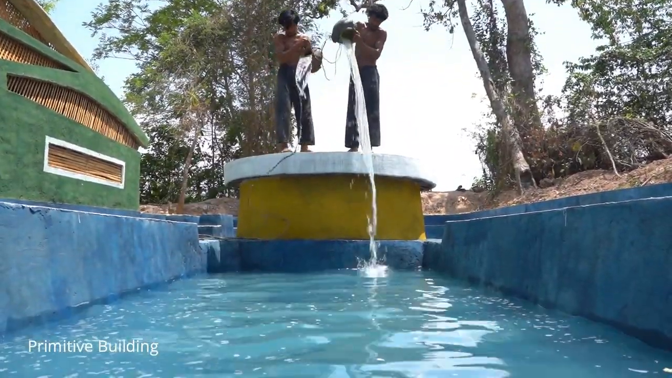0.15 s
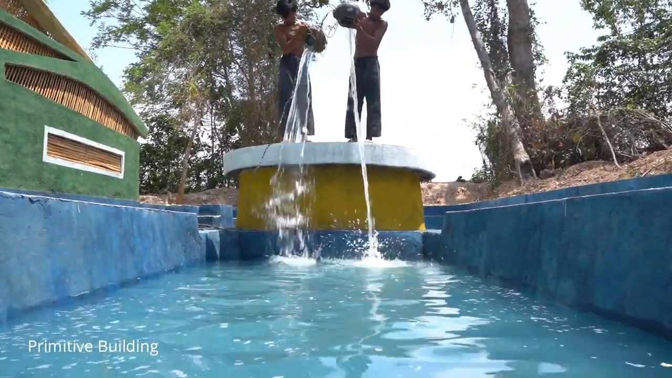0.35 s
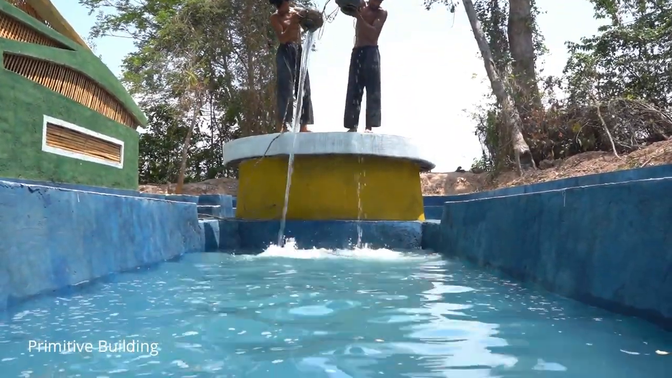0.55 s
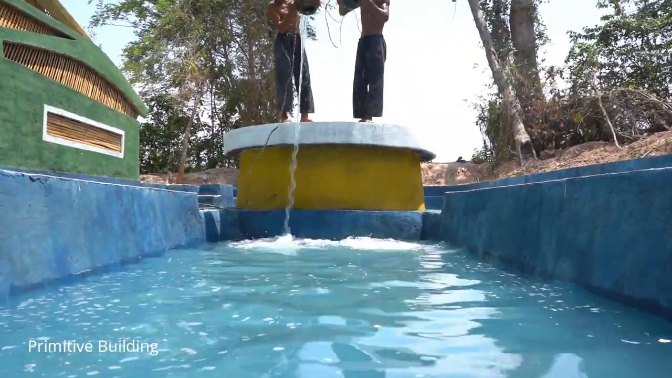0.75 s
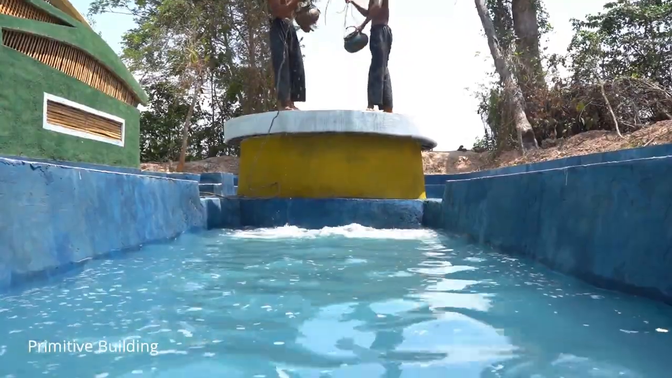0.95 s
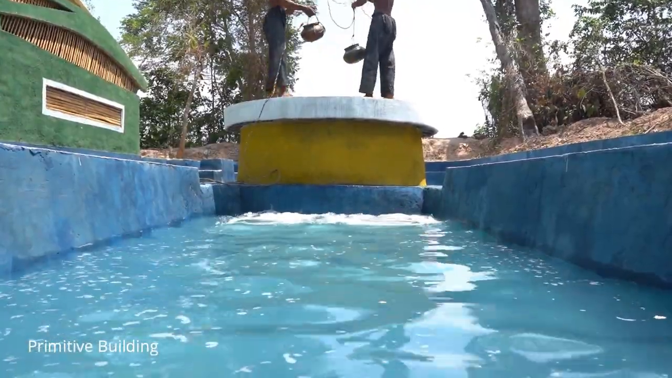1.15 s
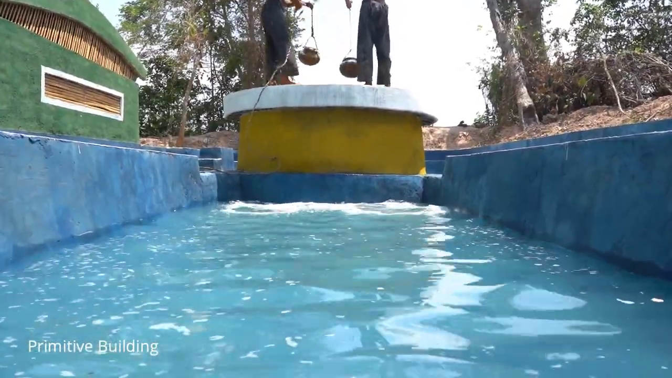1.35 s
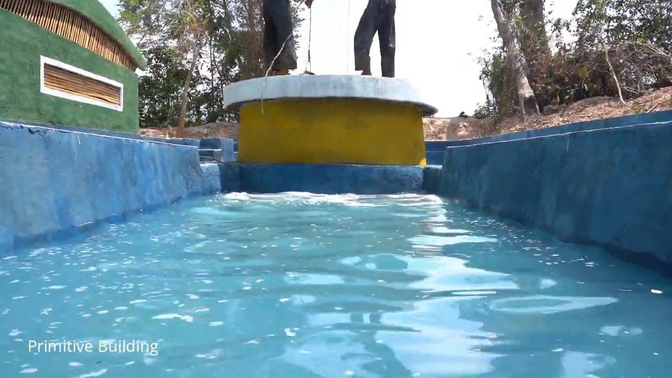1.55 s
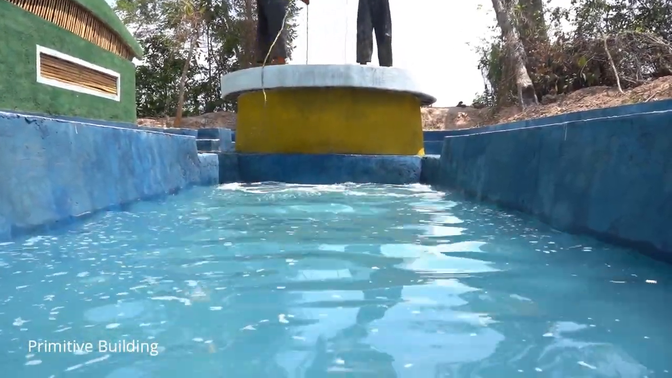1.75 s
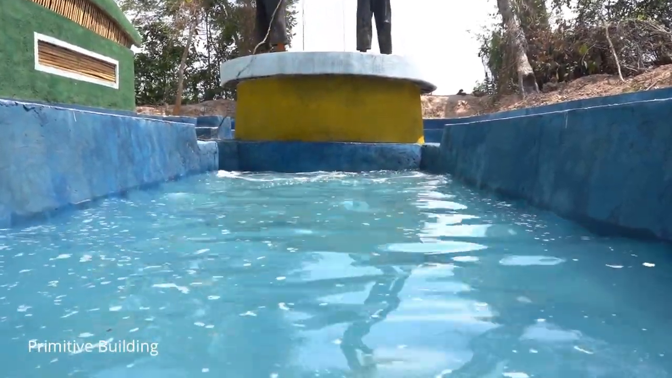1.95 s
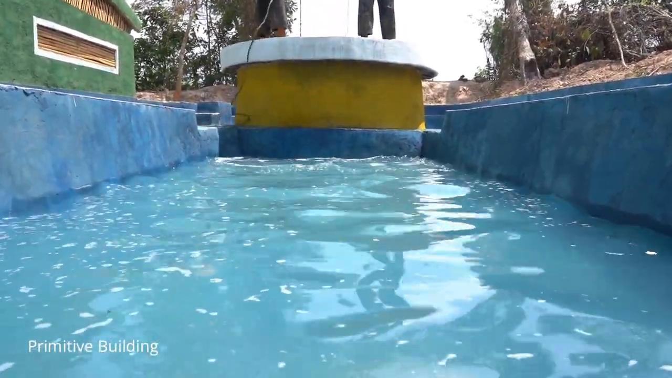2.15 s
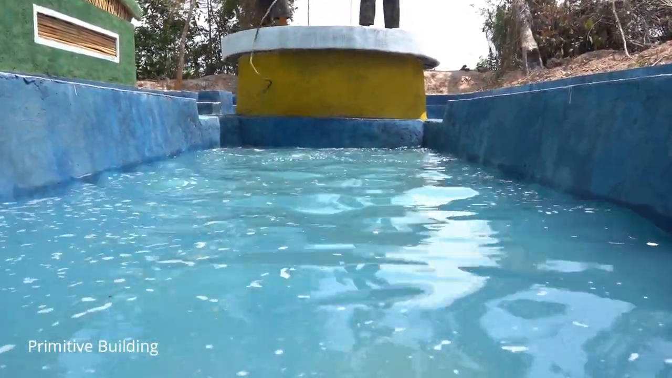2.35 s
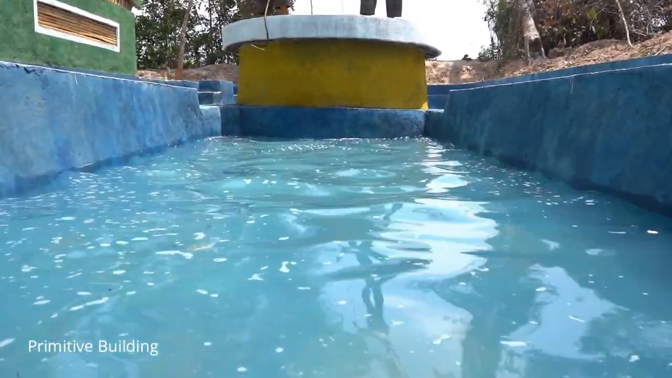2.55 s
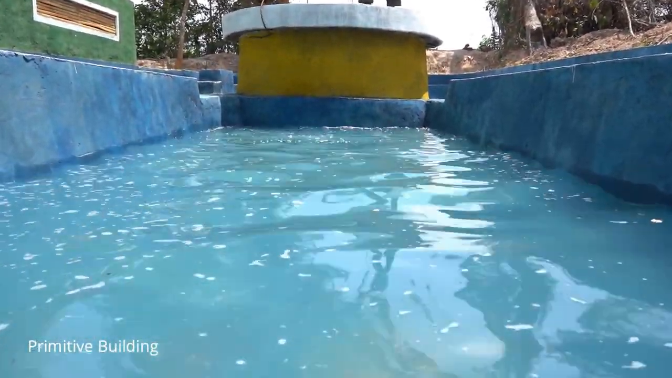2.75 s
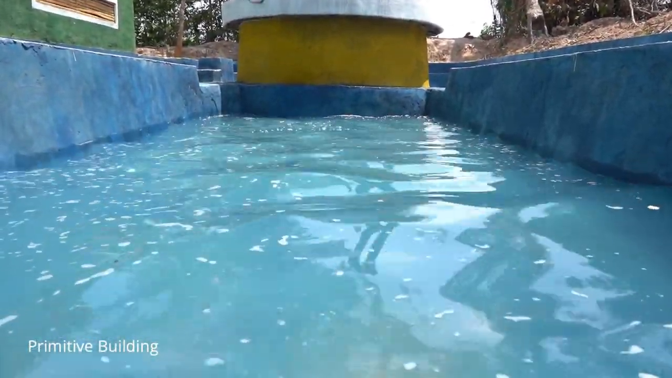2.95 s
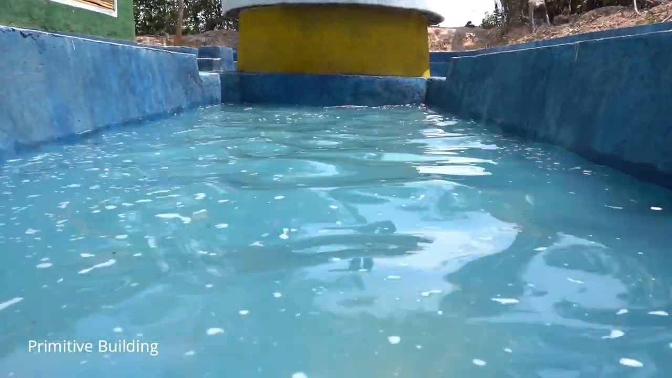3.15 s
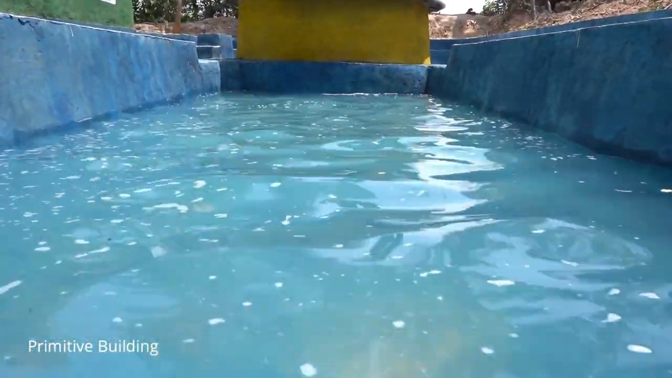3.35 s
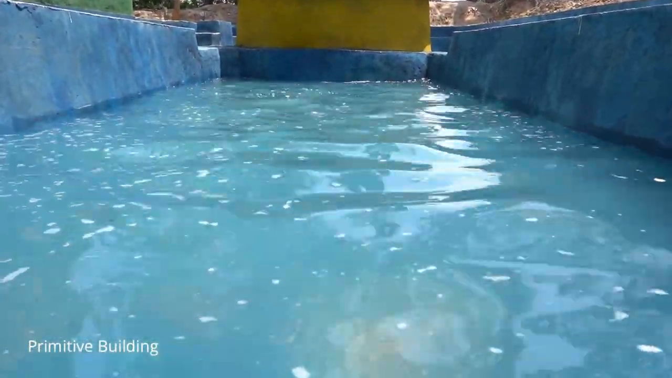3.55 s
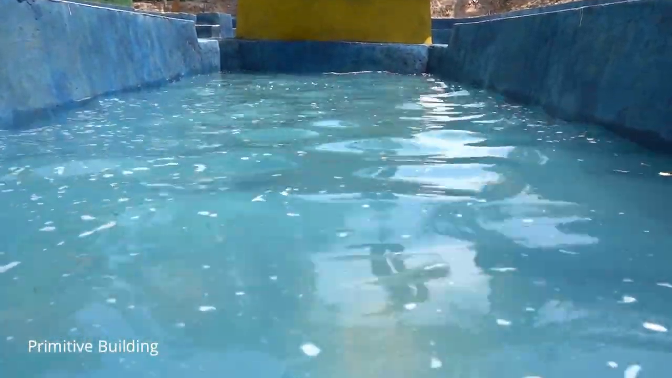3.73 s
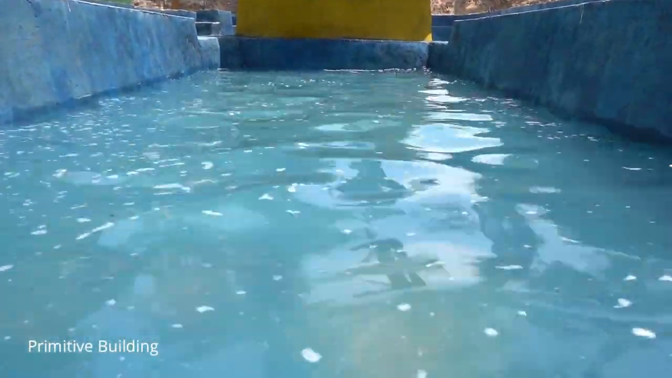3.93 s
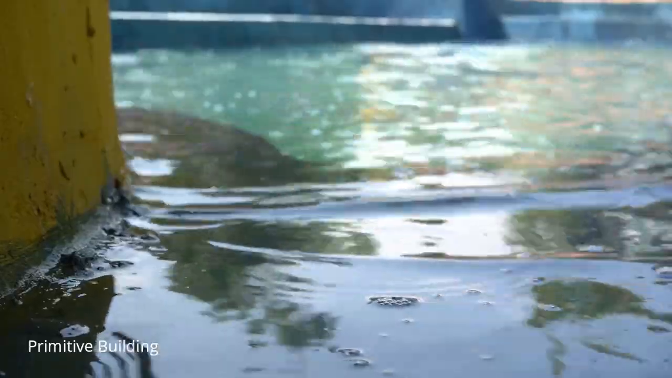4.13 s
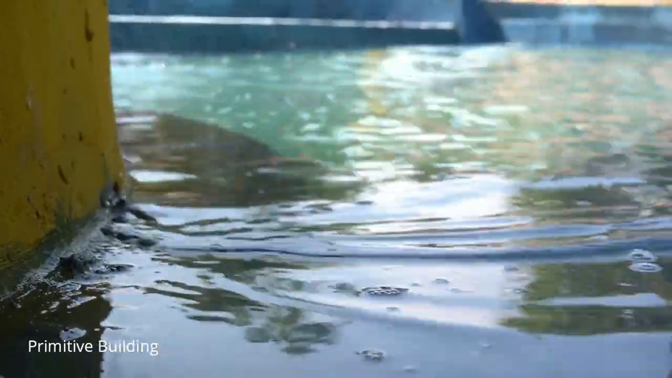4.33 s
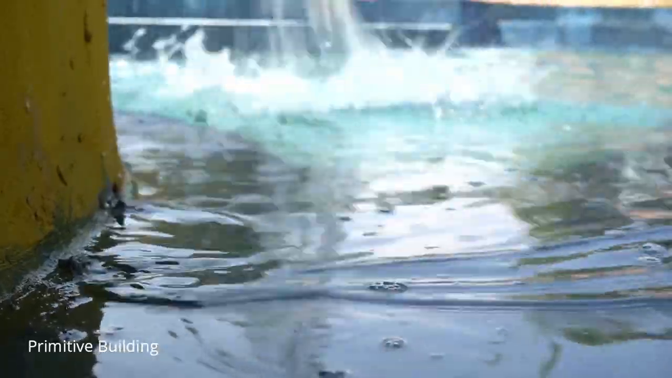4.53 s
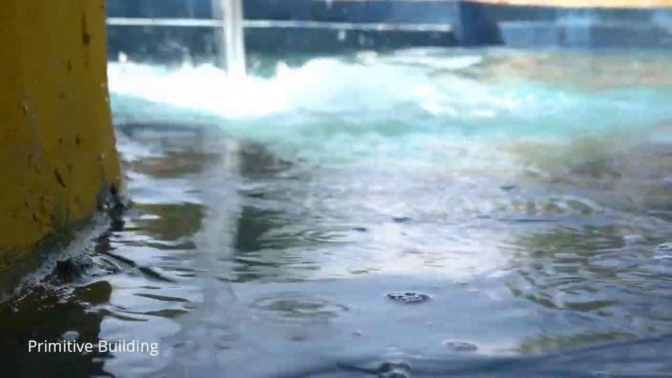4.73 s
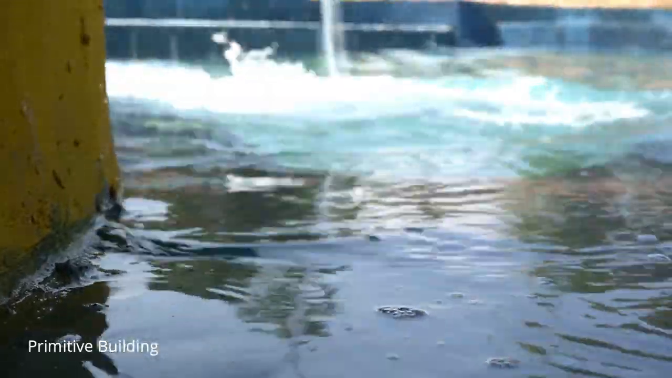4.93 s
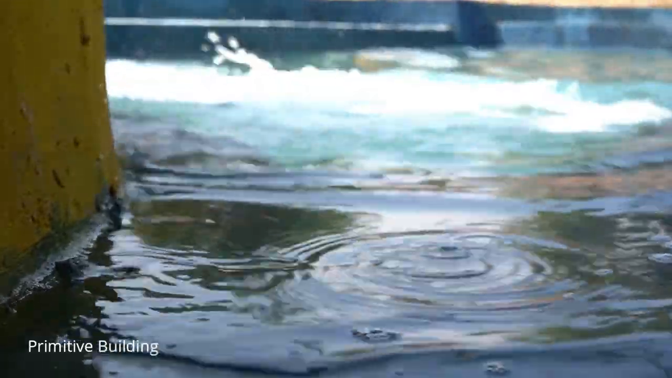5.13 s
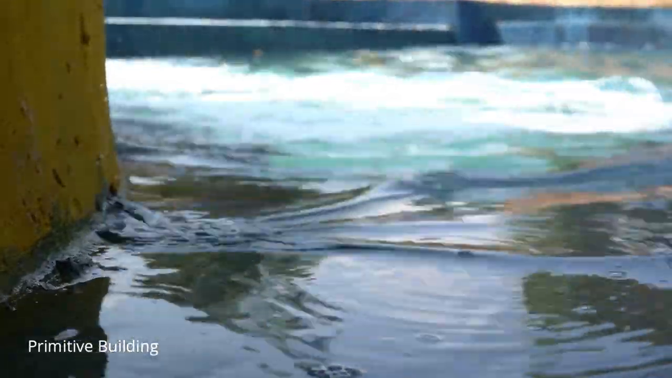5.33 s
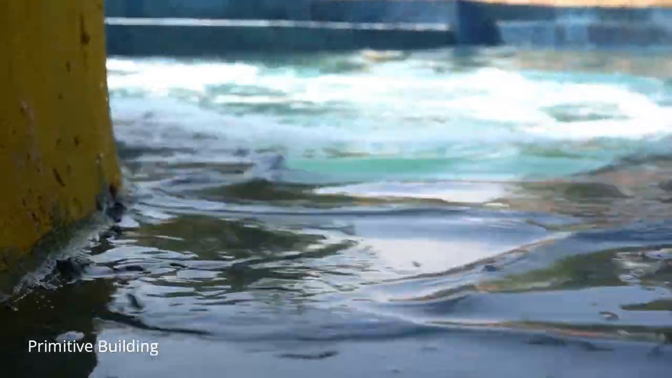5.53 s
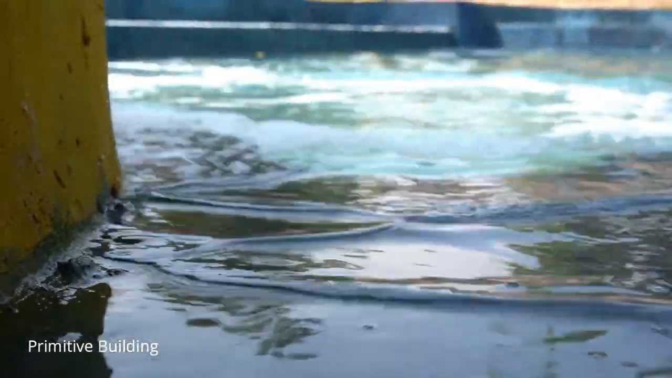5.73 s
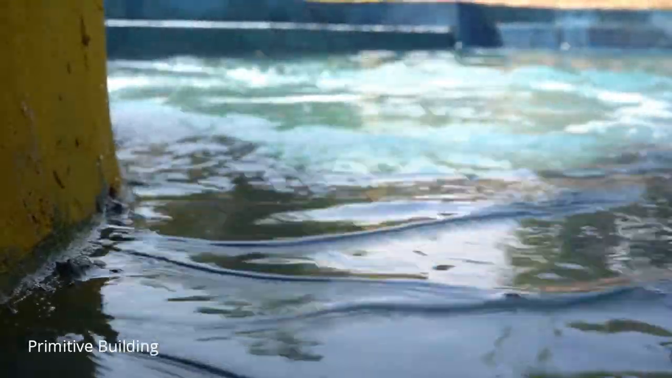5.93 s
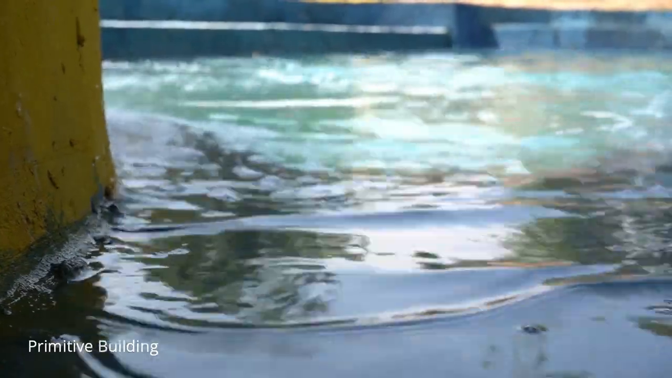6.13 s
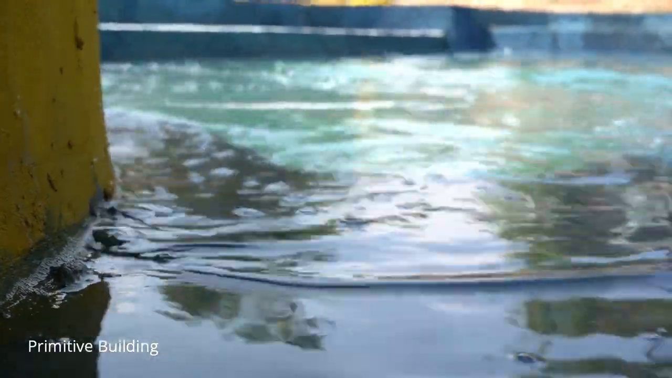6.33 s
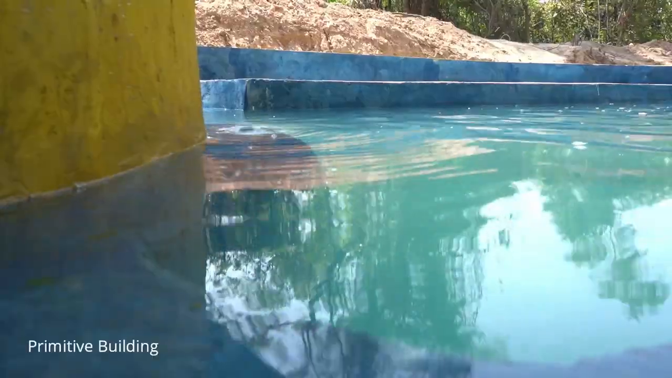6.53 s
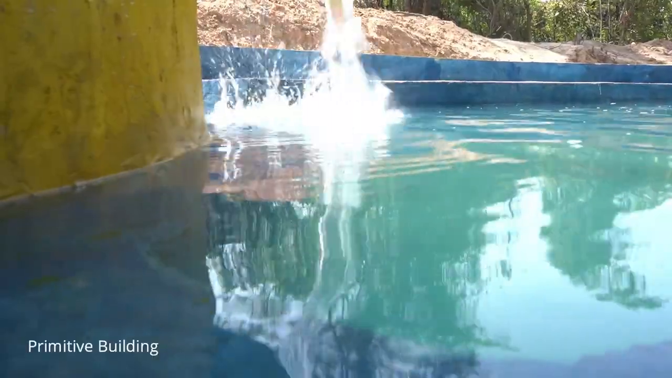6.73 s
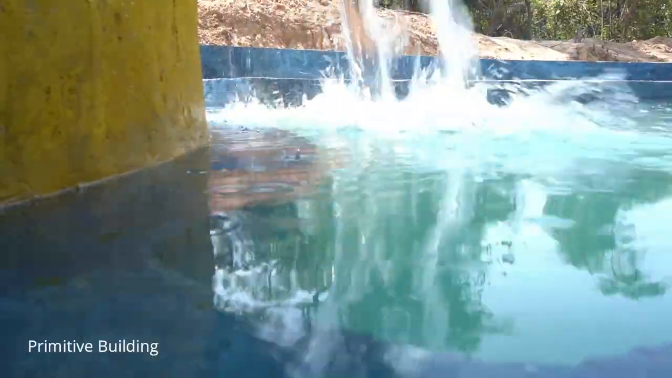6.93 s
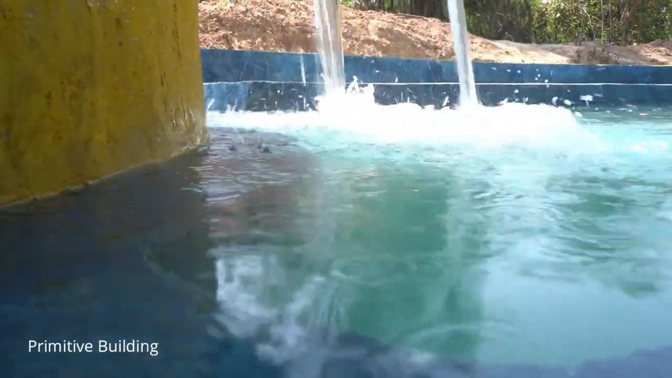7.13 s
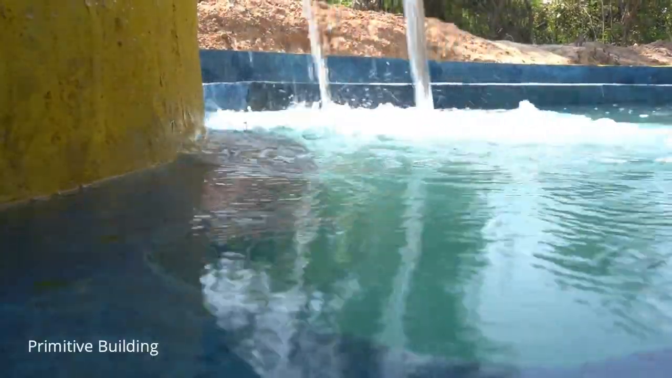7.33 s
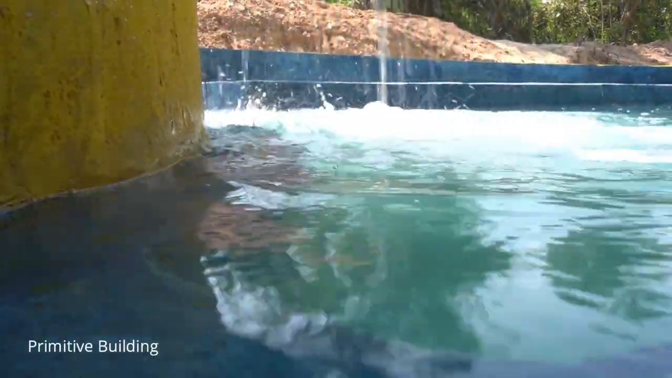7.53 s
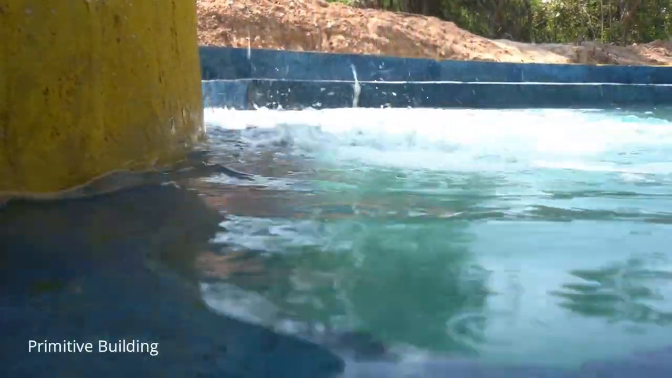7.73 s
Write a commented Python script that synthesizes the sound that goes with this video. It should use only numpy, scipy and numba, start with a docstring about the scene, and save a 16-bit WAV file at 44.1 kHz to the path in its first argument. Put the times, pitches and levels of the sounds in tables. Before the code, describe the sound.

Water pours from a height into a walled outdoor pool right from the start, bubbling and slapping the surface until about 0.8 seconds. Foam then fizzes softly over gentle lapping and small gurgles. A distant bird chirps faintly around 1.5 and 2.1 seconds, and a hollow pot is lightly bumped at 2.7. The sound dips out for an instant at 3.6 seconds, and a second pour splashes from 3.7 to about 4.9, settling again into fizz and ripples. After another brief dip at 6 seconds, the third and loudest pour runs from about 6.3 to 7.5, with a sharp slap at 6.4 and a quick string of splashes and spatter. Fizzing foam and a small wash of water carry on to the end, near 8 seconds. The walls add short, slight echoes, a faint low rumble swells with the pours, and leaves and air hiss very faintly throughout.

```python
"""Water pours three times from a ledge into a walled pool outdoors.
The stream drags air under, and each bubble rings briefly like a tiny bell; lumps of water slap
the surface amid soft blips and thumps, and a low rumble swells. Between pours the foam fizzes,
the pool laps and gurgles, a hollow pot is bumped and a far bird chirps. The walls add short
echoes, and leaves and air hiss faintly. Twice the whole sound fades out for a moment."""
import sys
import numpy as np
from scipy import signal
from scipy.fft import rfft, irfft, next_fast_len
from scipy.io import wavfile
from numba import njit

SR = 44100
rng = np.random.default_rng(int(sys.argv[2]) if len(sys.argv) > 2 else 0)


def transcribe(signal):
    """Save signal, clipped to [-1, 1], as a 16-bit WAV file at the path in sys.argv[1]."""
    frames = np.atleast_2d(signal).T
    limited = np.clip(frames, -1, 1)
    pcm = np.round(limited * 32767).astype(np.int16)
    wavfile.write(sys.argv[1], SR, pcm)


N = 347067
STEP = 16   # samples between the points of a slow loudness curve

# Levels are relative. A decay is the time to fall by 60 dB. Balance is left minus right.
# two fades split the scene into three parts, one pour in each: t/s, fade-out/s, fade-in/s
FADES = [(3.623, 0.021, 0.12), (5.996, 0.042, 0.028)]
# tone of the low rumble that swells with each pour, a list per part: f/Hz, level/dB
RUMBLE_SPECTRA = [
    [(13, -34), (22, -21), (54, 6.5), (102, 4), (226, -3.5), (268, -6.5), (329, -13.5), (400, -11.5),
     (520, -18), (880, -120)],
    [(13, -40), (22, -4), (75, 5.5), (119, -5), (226, 0.5), (299, -14), (346, -5.5), (400, -16), (520, -60),
     (880, -120)],
    [(13, -47), (22, -8), (98, 1), (141, 8), (163, 4), (188, -22), (226, -6), (400, -19), (520, -44),
     (880, -120)],
]
# loudness of the rumble, a list per part: t/s, level/dB
RUMBLE_LEVELS = [
    [(0.0, -47), (0.6, -59), (1.55, -59), (2.14, -57.5), (2.3, -63), (2.7, -60.5), (3.3, -61.5),
     (3.62, -68.5)],
    [(3.63, -57.5), (3.87, -72), (4.5, -53), (4.9, -63.5), (5.5, -62), (5.8, -57), (5.99, -58)],
    [(6.0, -62), (6.22, -67.5), (6.5, -63), (6.63, -41.5), (7.0, -57), (7.2, -64), (7.42, -54.5),
     (7.87, -60.5)],
]
# tone of leaves and air: f/Hz, level/dB
HISS_SPECTRUM = [(1500, 2), (3000, 7), (6000, 4), (11000, 2.5), (16500, -1)]
HISS_DB = (-67, -62.5, -73.5)   # one per part
# bird chirps: t/s, length/s, start f/Hz, end f/Hz, level/dB
CHIRPS = [(1.493, 0.062, 4280, 3950, -55), (1.6, 0.034, 4100, 3970, -50), (2.045, 0.018, 3320, 3200, -58),
          (2.068, 0.029, 3110, 2890, -59.5), (2.116, 0.031, 2930, 3720, -65),
          (2.145, 0.027, 4220, 4130, -61), (2.146, 0.025, 3970, 3910, -56.5)]
# ringing tones of the pot: f/Hz, level/dB, decay/s
POT_TONES = [(267, -42, 0.32), (1440, -36.5, 0.035), (2280, -48, .03)]
# how the air between water and walls colours the sound, a list per part: f/Hz, width/Hz, boost/dB
HOLLOW_BANDS = [
    [(280, 45, 8.5), (374, 82, 3.5), (477, 104, -7), (960, 120, 3.5), (1240, 380, 4.5), (1580, 160, -1.5),
     (2300, 680, 3)],
    [(191, 8, 4), (290, 36, -10.5), (395, 24, 10.5), (478, 160, -11.5), (608, 33, 2.5), (1244, 54, 5),
     (2250, 330, 0.5)],
    [(320, 47, 6.5), (385, 143, -17), (503, 47, 8), (790, 78, 4.5), (1329, 200, 4.5), (1947, 150, 4.5)],
]
# how bubbles lean to one side: f/Hz, balance/dB
BUBBLE_BALANCE = [(60, -1), (180, 0.5), (550, -0.5), (1650, -2), (4970, 1), (15000, -8)]

# soft puffs (blips, low thumps, small gurgles): t/s, level/dB, f/Hz, rough length/s, width/octaves
PUFFS = [(0.162, -43, 79.4, .054, 0.33), (0.635, -51.5, 1560, 0.034, .15), (0.687, -63, 1330, 0.034, .2),
         (0.757, -50.5, 1190, 0.022, 0.46), (0.854, -55.5, 2020, 0.035, .7),
         (0.974, -56, 2180, 0.021, 0.52), (1.713, -62, 1900, .02, 0.4), (1.801, -56, 4460, 0.054, .4),
         (2.141, -63, 660, .05, 1.1), (2.427, -69, 4270, 0.028, 0.44), (2.478, -60, 200, 0.033, 1.4),
         (2.543, -68, 1370, 0.065, 0.55), (2.649, -59, 4100, 0.055, .45), (2.84, -63, 1780, .04, 0.3),
         (2.895, -58, 1010, 0.067, 1.9), (2.953, -63.5, 3870, 0.04, .3), (3.405, -64.5, 2830, .025, .22),
         (3.558, -70, 3470, 0.072, .4), (3.722, -43.5, 1500, 0.039, 0.57), (3.757, -62, 377, 0.059, 0.27),
         (4.066, -44.5, 585, .022, 0.15), (4.254, -46, 1240, 0.04, 0.16), (4.419, -43, 1190, 0.051, 0.11),
         (4.591, -45, 800, .019, 1.1), (4.634, -48, 820, .017, 0.46), (4.789, -45.5, 1410, 0.027, 0.74),
         (4.822, -52.5, 370, 0.032, 0.26), (4.89, -67, 2460, .03, .44), (5.153, -62.5, 1340, 0.048, 0.073),
         (5.341, -58, 1920, 0.042, .72), (5.52, -65, 1330, 0.027, 0.13), (5.586, -63.5, 1940, .025, .29),
         (5.69, -62, 1950, 0.018, 0.75), (5.766, -55.5, 2310, 0.016, 0.62), (5.827, -59, 850, .035, 0.47),
         (5.969, -69, 1140, .025, .26), (6.053, -74, 6500, 0.034, 1), (6.138, -68, 1960, 0.024, .15),
         (6.152, -62, 1280, 0.019, 1.1), (6.204, -57, 700, 0.0096, 3.4), (6.468, -36.5, 1310, 0.027, 0.34),
         (6.515, -37.5, 342, .056, 1.4), (6.847, -43, 3680, 0.02, 0.082), (6.942, -36.5, 1780, 0.049, 0.44),
         (7.007, -38, 2380, 0.052, 0.21), (7.051, -36.5, 130, .03, 0.89), (7.125, -41, 3160, 0.03, 0.41),
         (7.39, -44, 1050, 0.017, 0.42), (7.422, -53.5, 544, 0.036, 0.26),
         (7.426, -52.5, 1200, 0.018, 0.27), (7.745, -57, 2250, .025, 0.31)]
# tone of each kind of bubble, a list per part: f/Hz, level/dB
FIZZ_SPECTRA = [
    [(1060, -50), (1800, -6), (2920, 0), (4100, 3), (7840, -4), (15100, -23), (16000, -30.5)],
    [(1060, -37), (1800, -15), (3710, -2.5), (4100, -7.5), (6830, -4), (14900, -22), (16000, -21)],
    [(1060, -26.5), (1800, -11.5), (2390, -3), (5150, -8), (7150, -3), (15100, -20.5), (16000, -31)],
]
LAPPING_SPECTRA = [
    [(210, -54), (350, -3.5), (453, 1), (689, 6.5), (790, -4), (2400, -5), (3120, -24), (5280, -120)],
    [(210, -60.5), (350, -16.5), (398, -27), (1070, -10.5), (1320, 4), (2400, 2), (3120, -25.5),
     (5280, -120)],
    [(210, -40), (350, -11), (370, -39.5), (528, 0.5), (1050, -1.5), (2400, -4), (3120, -42.5),
     (5280, -120)],
]
SPRAY_SPECTRA = [
    [(1590, -36), (2700, -14.5), (3640, 4.5), (5390, -7.5), (7770, -10), (15000, -28.5), (16000, -34.5)],
    [(1590, -2.5), (2700, 8), (3200, -0.5), (5010, -1.5), (8820, -9), (15000, -25.5), (16000, -39)],
    [(1590, -15.5), (2700, 0), (3750, -2.5), (5010, -7), (11800, -17), (14800, -29.5), (16000, -24.5)],
]
FROTH_SPECTRA = [
    [(350, -47), (600, -41), (687, -9), (1240, 2), (3000, -2), (3900, -35.5), (6600, -120)],
    [(350, -44), (600, -3), (961, -1), (1230, 4), (3000, -13.5), (3900, -32), (6600, -120)],
    [(350, -50), (600, 0), (1060, -0.5), (1950, 2.5), (3000, -6.5), (3900, -33), (6600, -120)],
]
LARGE_SPECTRA = [
    [(53, -39), (90, -57), (265, 1), (501, -14.5), (700, -2), (910, -32.5), (1540, -120)],
    [(53, -41), (90, -36), (190, 0.5), (297, -0.5), (700, 1.5), (910, -39.5), (1540, -120)],
    [(53, -33.5), (90, -16.5), (418, 10), (510, -2), (700, 4.5), (910, -22), (1540, -120)],
]
# the pool left alone, a row per part: fizz level/dB, lapping level/dB
CALM_POOL = [(-70, -63), (-67, -70.5), (-85, -73)]
# waves wash along the wall: t/s, fizz level/dB, lapping level/dB
WASHES = [(1.3, -72, -69), (2.52, -63.5, -65), (2.84, -59.5, -59), (5.15, -74, -60), (7.52, -52, -58.5)]
# the foam of each pour at its height: t/s, level/dB
FOAM_PEAKS = [(1.3, -47), (5.28, -49.5), (7.8, -42)]
WASH_DB_PER_S, FOAM_RISE_DB_PER_S, FOAM_FALL_DB_PER_S = 69, 9.5, 16.5

# water slaps the surface: t/s, level/dB, f/Hz, decay/s, width/octaves, balance/dB, spatter level/dB
SLAPS = [(0.364, -21.5, 1240, 0.043, 0.65, -1, -43), (0.413, -17.5, 1040, 0.032, 1.8, 4, -40),
         (0.489, -24.5, 1030, 0.028, 1.1, 1, -54), (0.569, -21.5, 1910, 0.043, 0.49, -2, -45),
         (0.659, -30, 3630, 0.044, 1.2, 1, -42), (0.738, -32, 1370, 0.029, 3.5, 2, -70),
         (1.816, -34.5, 4650, 0.034, 1.5, -2, -41), (2.707, -35, 1440, 0.034, 1.6, -1, -49.5),
         (3.25, -43, 3550, 0.094, 2.4, 2.0, -74), (3.361, -66, 2310, 0.035, 1.8, -3, -54),
         (3.848, -39, 1210, 0.023, 1.2, 7, -63), (3.976, -28, 1290, 0.029, 2.3, -2.5, -52),
         (4.077, -20.5, 1400, 0.031, 1.3, -7, -34), (4.33, -21.5, 1160, 0.026, 1.9, -1, -54),
         (4.449, -22.5, 1180, 0.036, 2, -4, -43), (4.487, -19.5, 1230, 0.026, 3.6, 0, -38),
         (4.585, -29, 1180, 0.028, 4, -6, -42), (4.617, -30, 1260, 0.049, 1.3, -7, -45),
         (4.742, -22.5, 1420, 0.025, 2.1, 1, -44), (4.804, -30.5, 1880, 0.053, 1.9, 0, -77.5),
         (5.76, -38, 4200, 0.032, 0.75, -4, -55), (6.188, -47, 1080, 0.036, 3.5, -2, -64),
         (6.431, -11, 2020, 0.021, 3.6, -2.5, -23), (6.579, -16, 3710, 0.014, 1.7, -4, -30),
         (6.852, -22, 1940, 0.073, 1.9, -6, -38), (6.947, -21, 1870, 0.061, 0.92, -1, -46),
         (6.975, -18.5, 1430, 0.054, 0.72, -1, -38), (7.045, -14.5, 1920, 0.052, 0.75, -1.5, -34),
         (7.094, -17.5, 2850, 0.033, 0.76, 0, -37), (7.209, -14, 3600, 0.02, 0.55, -1, -27.5),
         (7.221, -22, 1240, 0.017, 1.2, -2, -36), (7.246, -18, 2300, 0.034, 1.06, -4, -32),
         (7.338, -26, 2640, 0.026, 2.8, -2, -47), (7.38, -36, 1170, 0.038, 3.2, 1, -44),
         (7.48, -30.5, 3280, 0.04, 2.7, 0, -59), (7.574, -27, 2760, 0.05, 1.44, -2, -58)]
# the steady stream, a list per pour: t/s, froth level/dB
STEADY_FLOW = [
    [(0.0, -31.5), (0.14, -32.5), (0.28, -37), (0.35, -39.5), (0.45, -36), (0.57, -37), (0.61, -53.5),
     (0.73, -52.5), (0.8, -73)],
    [(3.68, -90), (3.706, -45.5), (3.81, -44.5), (3.95, -41.5), (4.0, -36.5), (4.35, -34.5), (4.51, -40.5),
     (4.65, -42.5), (4.8, -51.5), (4.9, -86)],
    [(6.238, -88), (6.262, -39.5), (6.41, -34.5), (6.45, -30), (6.66, -32.5), (7.03, -35.5), (7.2, -37.5),
     (7.28, -50.5), (7.38, -55), (7.45, -71)],
]
# level/dB at full flow, a row per pour: large bubbles, spray, fizz, lapping
AT_FULL_FLOW = [(-46.5, -35.5, -47.5, -33), (-39.5, -41, -46, -46), (-44, -35, -36.5, -40)]
# change/dB for 1 dB more flow: large bubbles, spray, fizz, lapping
FLOW_RESPONSE = (2.24, 0.72, 0.72, 1.6)
FULL_FLOW_DB = -35
# the stream comes in gushes: t/s, large bubble level/dB, froth level/dB, spray level/dB
GUSHES = [(0.006, -67, -25, -22), (0.093, -32, -32, -40), (0.18, -49, -50, -45), (0.304, -36.5, -33, -43),
          (0.365, -30, -31.5, -35.5), (0.418, -42, -34, -35.5), (0.484, -31.5, -32.5, -41),
          (0.57, -64, -42.5, -33.5), (0.748, -60, -56, -55), (3.708, -70, -48, -42), (3.854, -41, -40, -45),
          (3.9, -55, -42, -48), (3.981, -65, -39, -31), (4.078, -39, -32, -28), (4.332, -40, -53, -43),
          (4.452, -38.5, -34, -40.5), (4.488, -38.5, -54, -49), (4.58, -64, -54, -62),
          (4.738, -72, -46, -41.5), (4.816, -56, -55, -46), (6.263, -71, -34, -24),
          (6.294, -52, -35.5, -30), (6.451, -44, -54, -24), (6.502, -24.5, -36, -24),
          (6.574, -44, -28.5, -19), (6.852, -33.5, -31.5, -26.5), (6.978, -34, -32, -26.5),
          (7.048, -35.5, -29, -29.5), (7.092, -54, -31, -26.5), (7.212, -51, -44, -31),
          (7.249, -70, -55, -29.5), (7.384, -66, -60, -41.5), (7.416, -71, -72, -54)]
GUSH_RISE_DB_PER_S, GUSH_FALL_DB_PER_S = (898, 1199, 1501.5), (162, 159.5, 238.5)   # same three layers
THIN_DB, THIN_WIDTH_S, THIN_LEAD_S = -1.5, 0.0084, 0.017   # the stream thins just before a gush


def amp(db):
    """Turn decibels into a gain."""
    return 10 ** (np.asarray(db) / 20)


def unit_level(x):
    """Scale a sound to an average power of 1."""
    return x / np.sqrt(np.mean(x ** 2) + 1e-20)


def add(out, s, sound):
    """Mix a sound in at s seconds."""
    at = round(s * SR)
    out[:, at:at + sound.shape[1]] += sound[:, :N - at]


def part_at(samples):
    """The part (0, 1 or 2) that each sample falls in."""
    return np.searchsorted([s * SR for s, _, _ in FADES], samples)


def gain_curve(curves):
    """Join lists of (time, level) points into a gain per sample, silent between lists."""
    t = np.arange(N) / SR
    return sum(amp(np.interp(t, *np.transpose(points), left=-200, right=-200)) for points in curves)


def db_at(spectrum, hz):
    """Read a spectrum between its points, on a scale of octaves."""
    points_hz, points_db = np.transpose(spectrum)
    return np.interp(np.log(hz), np.log(points_hz), points_db)


def drift(rate_hz):
    """A slow random wobble, about 1 in size."""
    hop, warm_up = 40, 2000
    keep = np.exp(-2 * np.pi * rate_hz * hop / SR)
    noise = rng.standard_normal(N // hop + warm_up + 2)
    slow = signal.lfilter([1], [1, -2 * keep, keep ** 2], noise)[warm_up:]
    return np.interp(np.arange(N) / hop, np.arange(len(slow)), unit_level(slow))


def swell(s, top_db, rise, fall):
    """Power that climbs to top_db at time s, then sinks; rise and fall are in dB per second."""
    t = np.arange(0, N, STEP) / SR - s
    return amp(top_db - np.where(t < 0, -rise * t, fall * t)) ** 2


def shaped_noise(spectrum, alike):
    """Steady noise; alike runs from 0 (left and right unrelated) to 1 (the same)."""
    size = next_fast_len(N)
    shape = amp(db_at(spectrum, np.fft.rfftfreq(size, 1 / SR) + 1))
    mid, side = irfft(rfft(rng.standard_normal((2, size))) * shape, size)[:, :N]
    return unit_level(np.sqrt(1 + alike) * mid + np.sqrt(1 - alike) * side * [[1], [-1]])


def burst(hz, octaves, envelope):
    """A puff of noise around hz, partly shared by left and right."""
    edges = np.clip(hz * 2 ** (np.array([-.5, .5]) * max(octaves, .05)), 30, .45 * SR)
    band_pass = signal.butter(2, edges, "band", fs=SR, output="sos")
    warm_up = 800
    noise = rng.standard_normal((3, warm_up + len(envelope)))
    band = signal.sosfilt(band_pass, noise[:2] + 0.98 * noise[2])[:, warm_up:]
    return .5 * unit_level(band) * envelope


def rumble():
    """Low rumble that swells with each pour and sinks to a faint background between them."""
    noises = [shaped_noise(spectrum, alike=0.57) for spectrum in RUMBLE_SPECTRA]
    return gain_curve(RUMBLE_LEVELS) * np.choose(part_at(np.arange(N)), noises) * amp(2.5 * drift(5.9))


def hiss():
    """Leaves and air make a faint, even hiss."""
    return amp(HISS_DB)[part_at(np.arange(N))] * shaped_noise(HISS_SPECTRUM, alike=0)


def bird():
    """Short gliding whistles, roughened by the leaves on the way."""
    out = np.zeros((2, N))
    for s, length, start_hz, end_hz, level_db in CHIRPS:
        hz = np.linspace(start_hz, end_hz, int(length * SR))
        rough = 1.04 + signal.lfilter([.17], [1, -.97], rng.standard_normal((2, len(hz))))
        phase = np.cumsum(2 * np.pi * hz / SR) + rng.uniform(0, 2 * np.pi, (2, 1))
        add(out, s, amp(level_db + 3.5) * np.hanning(len(hz)) ** .5 * rough * np.sin(phase))
    return out


def pot_knock(at_s=2.708, attack_s=0.0018):
    """A hollow pot rings with three dying tones after one soft blow."""
    out, t = np.zeros((2, N)), np.arange(SR // 2) / SR
    for hz, level_db, decay_s in POT_TONES:
        envelope = amp(level_db - 60 * t / decay_s) * (1 - np.exp(-t / attack_s))
        add(out, at_s, envelope * np.sin(2 * np.pi * hz * t) * [[1], [.9]])
    return out


def wall_echoes(x, decay_s=0.094, echo_db=-12, dull_hz=36000):
    """Sound bounces between the walls, weaker and duller each time; six paths for each ear."""
    size = next_fast_len(N + SR // 2)
    hz = np.fft.rfftfreq(size, 1 / SR)
    echo = np.zeros((2, len(hz)), complex)
    for k, lag in enumerate(rng.uniform(.004, .02, 12)):
        bounce = amp(-60 * lag / decay_s) * np.exp(-2j * np.pi * hz * lag) / (1 + 1j * hz / dull_hz)
        echo[k % 2] += (-1) ** (k // 2) * bounce / (1 - bounce)   # all repeats added up
    return x + amp(echo_db) * irfft(rfft(x, size) * echo, size)[:, :N]


def hollow_air(x):
    """The air between water and walls boosts some pitches and weakens others."""
    parts = []
    for bands in HOLLOW_BANDS:
        y = x
        for hz, width_hz, db in bands:
            gain, width = amp(db / 2), np.pi * width_hz / SR
            tuning = -2 * np.cos(2 * np.pi * hz / SR)
            y = signal.lfilter([1 + width * gain, tuning, 1 - width * gain],
                               [1 + width / gain, tuning, 1 - width / gain], y)
        parts.append(y)
    return np.choose(part_at(np.arange(N)), parts)


@njit
def ring_bubbles(start, size, hz, cycles, glide):
    """Each bubble is a tone that dies by 40 dB while its pitch climbs by the share glide."""
    out = np.zeros((2, N + 40000))
    for b in range(len(hz)):
        span = min(int(cycles[b] * SR / hz[b]) + 2, 30000)
        angle = 2 * np.pi * hz[b] / SR
        wave = 1 + 0j   # a point that spirals inward; its height is the tone
        turn = 0.01 ** (1 / span) * np.exp(1j * angle)
        speed_up = np.exp(1j * angle * glide / span)
        for i in range(span):
            out[0, start[0, b] + i] += size[0, b] * wave.imag
            out[1, start[1, b] + i] += size[1, b] * wave.imag
            wave *= turn
            turn *= speed_up
    return out[:, :N]


def bubbles(spectra, per_s, cycles, glide, vary_db, clump_db, spread_s):
    """A crowd of ringing bubbles of varied strength, born in clumps all over the surface."""
    when, pitch, strength, sign, place, life = rng.random((6, int(per_s * N / SR)))
    births = np.cumsum(amp(clump_db * (drift(9) + drift(40))))
    born = np.interp(when, births / births[-1], np.arange(N))
    low, high = spectra[0][0][0], spectra[0][-1][0]
    hz = low * (high / low) ** pitch
    tone_db = np.choose(part_at(born), [db_at(spectrum, hz) for spectrum in spectra])
    size = hz * amp(tone_db - vary_db * np.log(np.maximum(strength, .03))) * np.sign(sign - .5)
    side_db = db_at(BUBBLE_BALANCE, hz) / 2
    lag = (place - .5) * spread_s * SR   # a bubble off to one side reaches that ear first
    start = (np.array([born - lag / 2, born + lag / 2]) + 80).astype(np.int64)
    stereo_size = size * amp([side_db, -side_db])
    return unit_level(ring_bubbles(start, stereo_size, hz, cycles * (.5 + life), glide))


def water_gains():
    """Loudness curves of large bubbles, froth, spray, fizz and lapping; their causes add as powers."""
    samples = np.arange(0, N, STEP)
    t, part = samples / SR, part_at(samples)
    flow = gain_curve(STEADY_FLOW)[::STEP]
    for s, *_ in GUSHES:
        flow *= amp(THIN_DB * np.exp(-((t - s + THIN_LEAD_S) / THIN_WIDTH_S) ** 2))
    response = (flow[:, None] / amp(FULL_FLOW_DB)) ** np.array(FLOW_RESPONSE)
    large, spray, fizz, lapping = (amp(AT_FULL_FLOW)[part] * response).T
    stream = np.array([large, flow, spray]) ** 2
    for s, *tops_db in GUSHES:
        stream += [swell(s, *shape) for shape in zip(tops_db, GUSH_RISE_DB_PER_S, GUSH_FALL_DB_PER_S)]
    pool = np.array([fizz, lapping]) ** 2 + amp(CALM_POOL)[part].T ** 2
    for k, (s, db) in enumerate(FOAM_PEAKS):
        pour_begun = (part == k) & (t > STEADY_FLOW[k][1][0])
        pool[0] += pour_begun * swell(s, db, FOAM_RISE_DB_PER_S, FOAM_FALL_DB_PER_S)
    for s, *tops_db in WASHES:
        pool += [swell(s, db, WASH_DB_PER_S, WASH_DB_PER_S) for db in tops_db]
    return [np.interp(np.arange(N), samples, np.sqrt(power)) for power in [*stream, *pool]]


def pool_surface(fizz, lapping):
    """Tiny bubbles fizz in the foam; bigger, lower ones ring in the lapping waves."""
    foam = bubbles(FIZZ_SPECTRA, 25000, 5.7, 0.056, vary_db=0.5, clump_db=0.83, spread_s=.0015)
    waves = bubbles(LAPPING_SPECTRA, 3500, 6.5, 0.19, vary_db=3, clump_db=1.64, spread_s=.0037)
    return fizz * foam + lapping * waves


def soft_puffs():
    """Short soft puffs: blips and low thumps during the pours, small gurgles between them."""
    out = np.zeros((2, N))
    for s, level_db, hz, length, octaves in PUFFS:
        envelope = np.hanning(int(1.6 * length * SR))
        add(out, s - 0.99 * length, amp(level_db + 10.5) * burst(hz, octaves, envelope))
    return out


def slaps():
    """A lump of water hits the pool: a quick crack, a bright spatter above and a thump below."""
    out, t = np.zeros((2, N)), np.arange(4000) / SR
    for s, level_db, hz, decay_s, octaves, balance_db, spatter_db in SLAPS:
        attack_s, fall_db = .11 * decay_s, 60 * t / decay_s
        attack = 1 - np.exp(-(t / attack_s) ** 2)
        crack = amp(level_db + 6.5 - fall_db) * burst(hz, octaves, attack)
        spatter = amp(spatter_db + 10.5 - fall_db / 1.12) * burst(7600, 1.18, attack)
        thump = amp(level_db - 12 - fall_db / 1.35) * burst(220, 2.0, attack)
        sides = amp([[balance_db / 2], [-balance_db / 2]])
        add(out, s - .6 * attack_s, sides * (crack + spatter + thump))
    return out


def pouring_stream(large, froth, spray):
    """The stream drags down a cloud of bubbles; lone ones ring out and lone droplets tick."""
    deep = bubbles(LARGE_SPECTRA, 1300, 15.8, 0.18, vary_db=3, clump_db=0.94, spread_s=.00095)
    middle = bubbles(FROTH_SPECTRA, 6500, 17, 0.19, vary_db=2.5, clump_db=1.08, spread_s=.00055)
    lone = bubbles(LARGE_SPECTRA, 120, 18, 0.19, vary_db=2.5, clump_db=2, spread_s=.0008)
    bright = bubbles(SPRAY_SPECTRA, 14000, 10.6, 0.059, vary_db=-1.5, clump_db=1.24, spread_s=.0011)
    ticks = bubbles(SPRAY_SPECTRA, 440, 2.2, 0.1, vary_db=7, clump_db=3, spread_s=.00055)
    return large * (deep + amp(-8) * lone) + froth * middle + spray * (bright + amp(-13.5) * ticks)


def scene():
    """Water, pot and bird echo between the walls, with rumble and hiss added."""
    large, froth, spray, fizz, lapping = water_gains()
    bubbling = pouring_stream(large, froth, spray) + pool_surface(fizz, lapping)
    water = hollow_air(amp(-2) * bubbling + slaps()) + soft_puffs()
    echoing = wall_echoes(water + pot_knock() + bird())
    bass_cut = signal.butter(4, 80, "high", fs=SR, output="sos")   # bubbles give off no deep bass
    return signal.sosfilt(bass_cut, echoing) + rumble() + hiss()


def record(dry):
    """The sound fades out and back in twice, and the highest treble is cut."""
    t, gain = np.arange(N) / SR, np.ones(N)
    for s, out_s, in_s in FADES:
        gain *= np.interp(t, [s - out_s, s, s + in_s], [1, 0, 1]) ** 1.17
    treble_cut = signal.ellip(12, .5, 80, 15950, fs=SR, output="sos")
    return signal.sosfilt(treble_cut, dry * gain)


dry = scene()
out = record(dry)
transcribe(out)
```